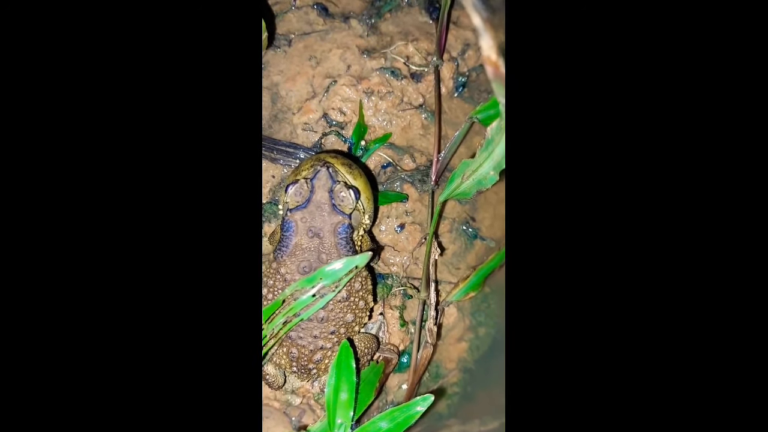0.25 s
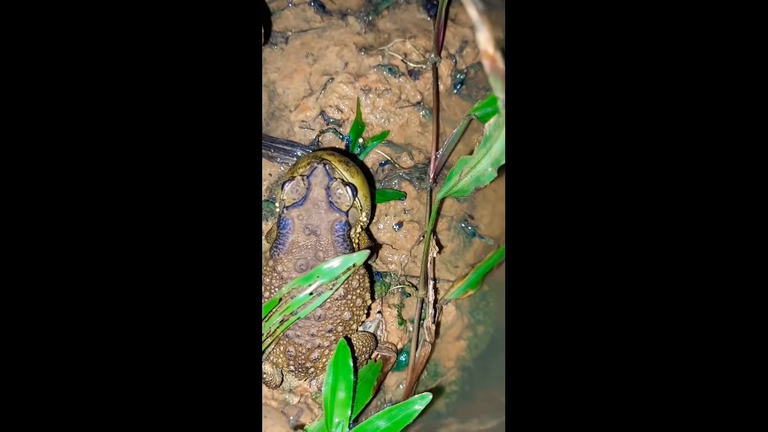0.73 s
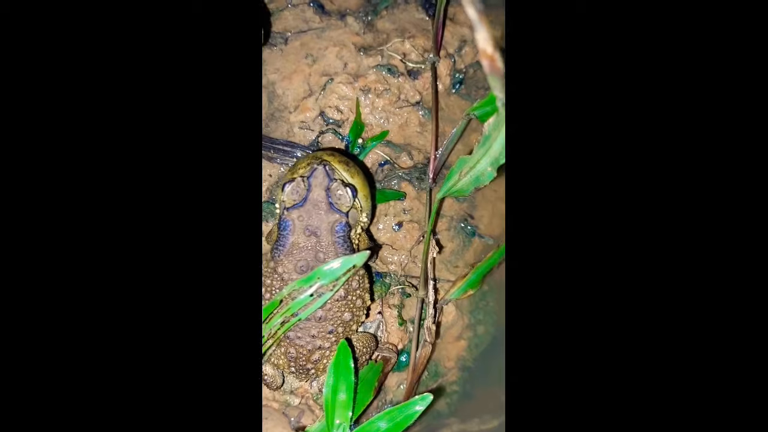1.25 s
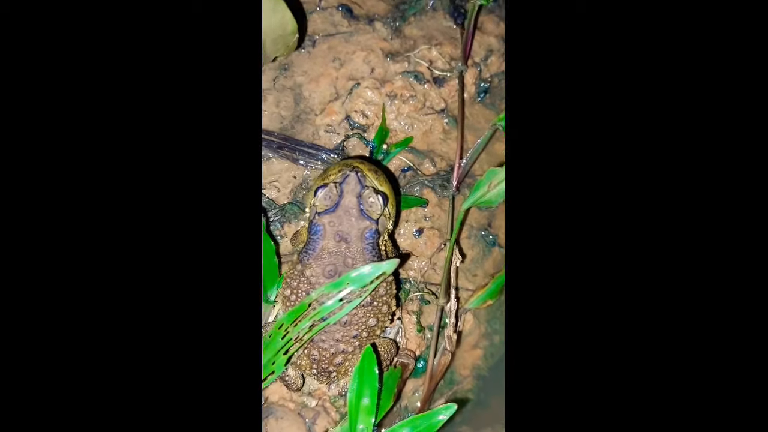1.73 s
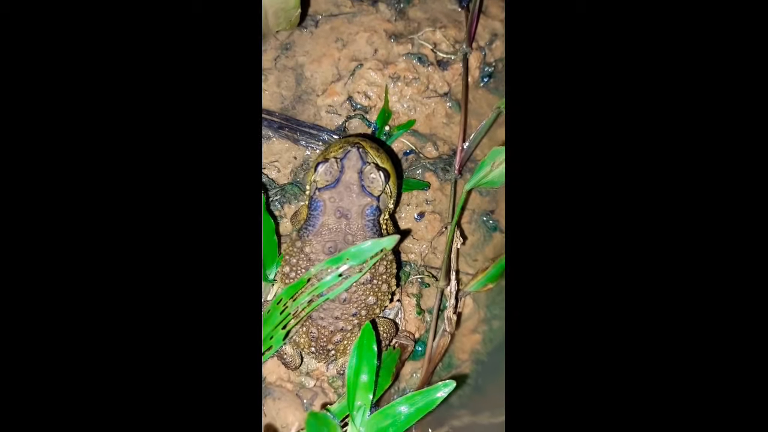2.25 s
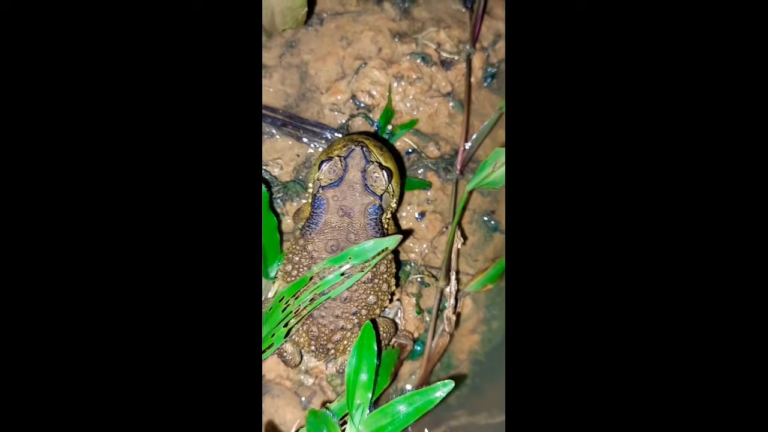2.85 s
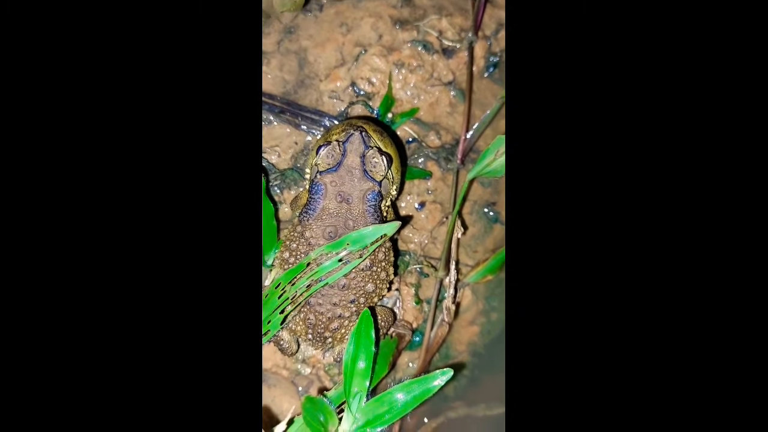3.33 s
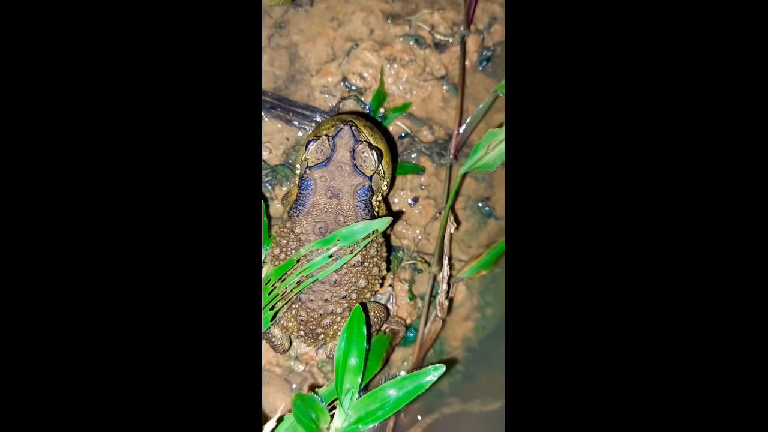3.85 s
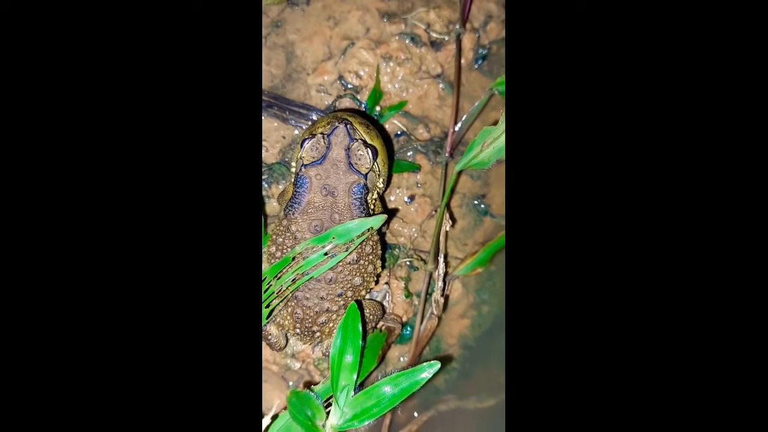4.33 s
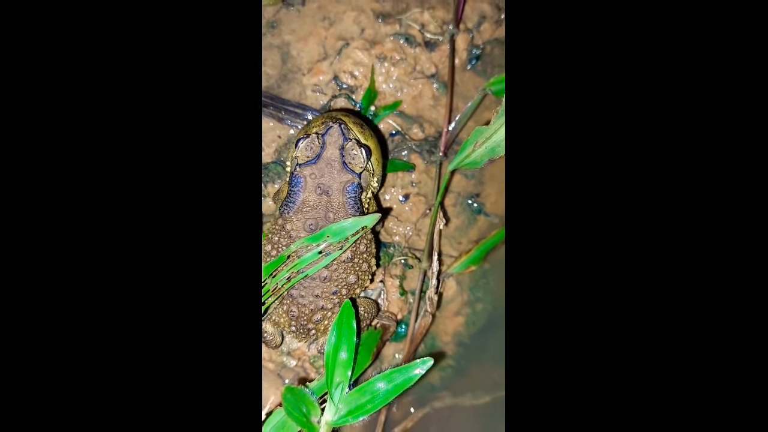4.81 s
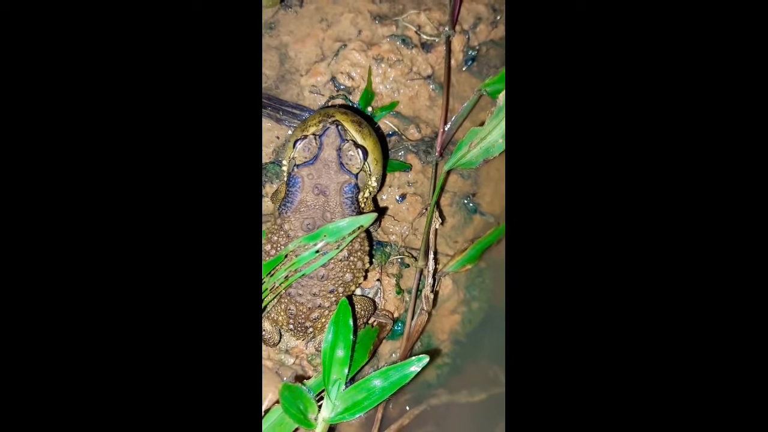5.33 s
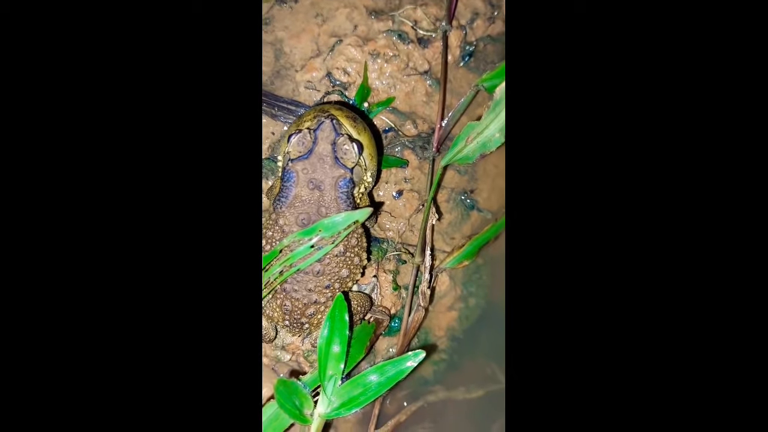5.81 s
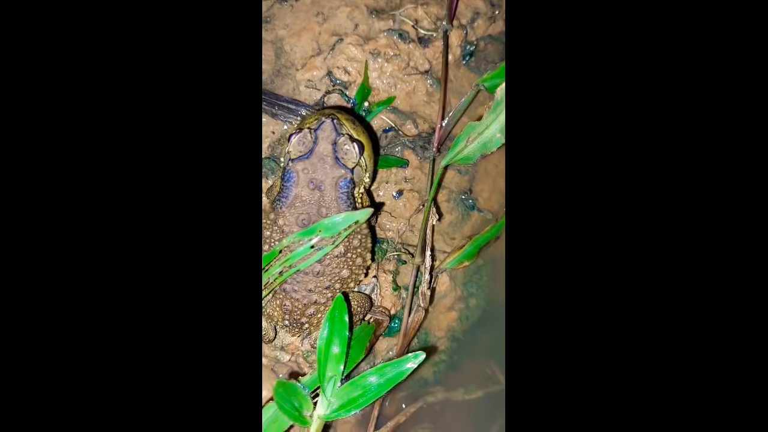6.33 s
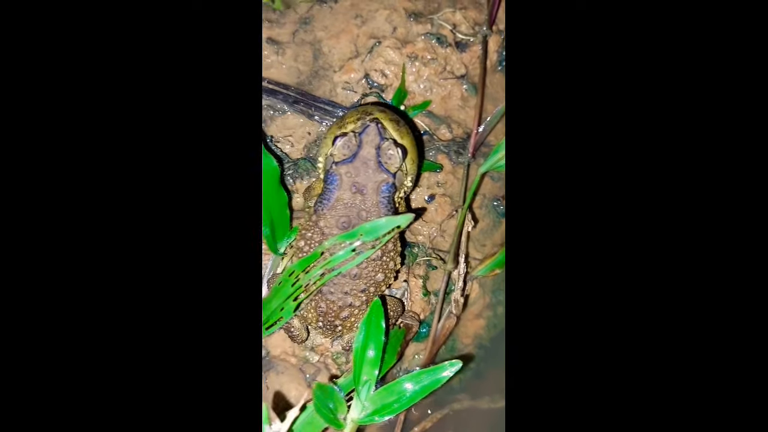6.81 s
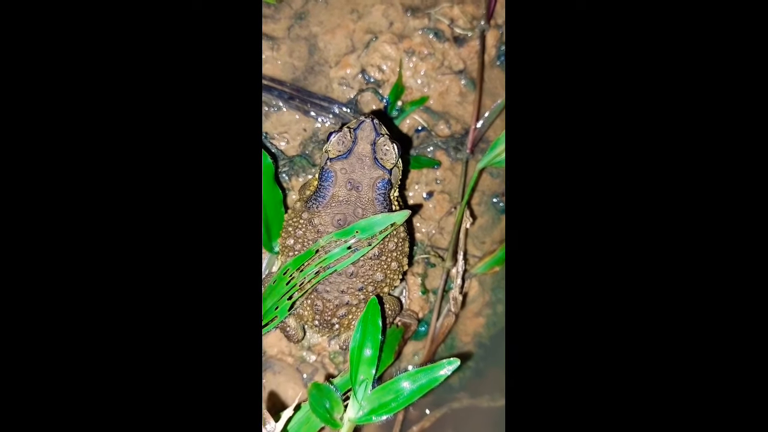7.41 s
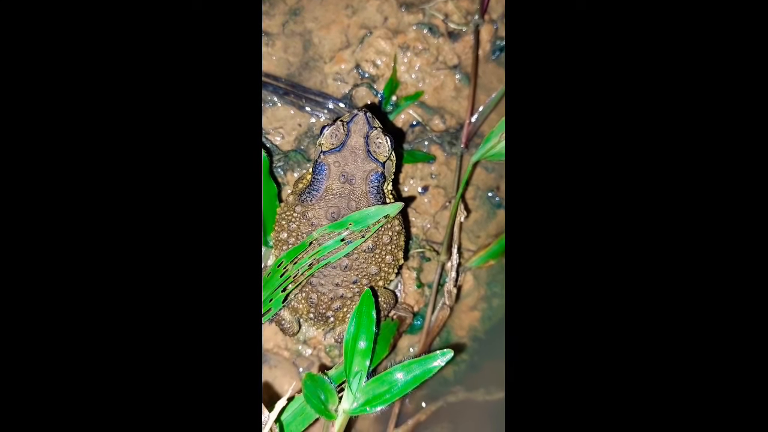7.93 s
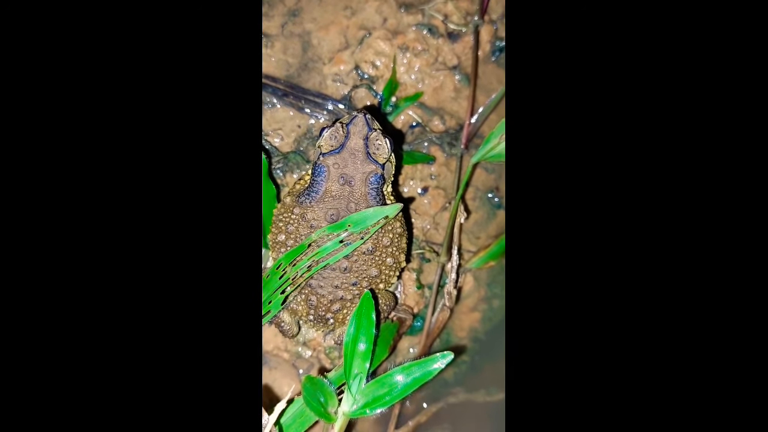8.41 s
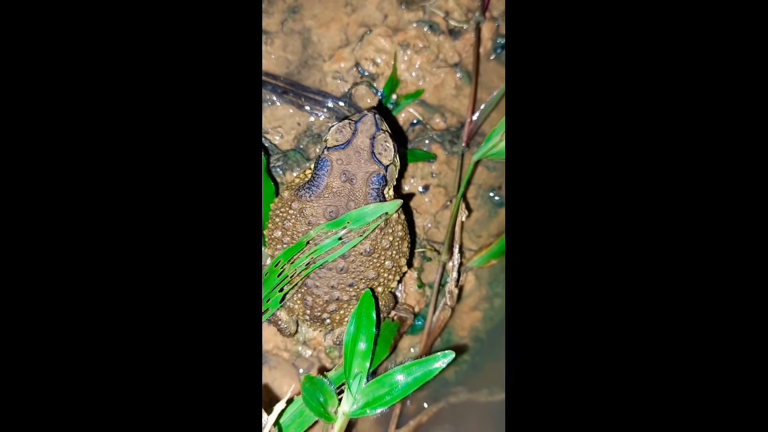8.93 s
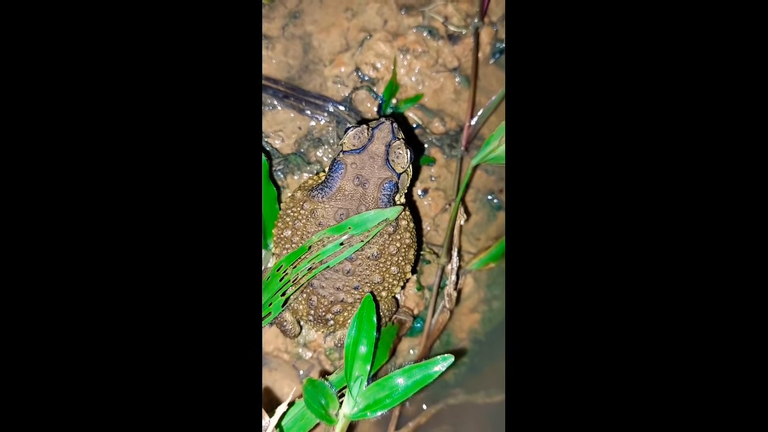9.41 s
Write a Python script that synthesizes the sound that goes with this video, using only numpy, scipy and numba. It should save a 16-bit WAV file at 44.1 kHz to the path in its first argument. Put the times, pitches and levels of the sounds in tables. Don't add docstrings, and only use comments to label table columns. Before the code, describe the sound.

Outdoors at night on wet ground, through a stereo phone at arm's length. From 0 s a close toad trills loudly at a steady pitch around 1.4 kHz: hard, hollow rapid pulses grouped into notes, about six a second at first, slowing to four or five and growing longer, each closing in a short buzzing run with a slight sagging tone. Limiting keeps it dense and pushes the night down. A similar toad trills faintly behind, high crickets shimmer, and a deeper frog gives lone rough croaks near 2.9, 3.1, 4.1 and 4.8 s. Just before 7 s the near toad stops. The background rises: the farther toad keeps trilling, the frog croaks about twelve times a second from 7.2 to 8.4 s, low crickets tick, and a falling mid-high cricket joins around 8 s. From 9.5 s another toad adds quick knocks and two short drooping tones before the end.

```python
import sys
import numpy as np
from scipy import signal
from scipy.io import wavfile
from numba import njit

SR = 44100
rng = np.random.default_rng(int(sys.argv[2]) if len(sys.argv) > 2 else 0)


def volts_from_db(level):
    exponent = np.asarray(level, float) / 20
    return 10 ** exponent


def bounce(signal):
    frames = np.transpose(np.atleast_2d(signal))
    limited = np.clip(frames, -1, 1)
    pcm = np.round(limited * 32767).astype(np.int16)
    wavfile.write(sys.argv[1], SR, pcm)


N = 426006


def ports(wave, left_db, lead):
    left = volts_from_db(left_db) * np.exp(1j * lead) * wave
    return np.array([left.imag, wave.imag])


def through_leaves(pair, share, rate_hz):
    lowpass = signal.butter(2, rate_hz, fs=SR, output="sos")
    blur = signal.sosfilt(lowpass, rng.standard_normal((2, N)))
    return pair * (1 + share * blur / np.std(blur)) / np.sqrt(1 + share ** 2)


def tones(starts, levels_db, length, hz, fall, skew, overtone_db=-90, scatter=1):
    out = np.zeros(N + SR, complex)
    u = np.arange(int(length * SR)) / (length * SR)
    shape = np.sin(np.pi * u ** skew) ** 0.5
    for s, level_db, (detune, start) in zip(starts, levels_db, rng.random((len(starts), 2))):
        pitch = hz * (1 + 0.015 * (detune - 0.5) - fall * (u ** 2 - scatter / 3))
        phase = 2 * np.pi * (scatter * start + np.cumsum(pitch) / SR)
        wave = np.exp(1j * phase) + volts_from_db(overtone_db) * np.exp(2j * phase)
        first = max(int(s * SR), 0)
        out[first:][:len(u)] += volts_from_db(level_db) * shape * wave
    return out[:N]


def night_floor(edge_db, alike, flicker_db):
    # (frequency [Hz], level [dB per Hz])
    spectrum = [(40, -30), (80, -6), (160, -22), (300, -25), (500, -16), (1100, -18), (1400, -1),
                (1800, -8), (2700, -14.5), (4000, -22), (7600, -28.5), (9200, -25), (11000, -44),
                (13000, -45.5), (15500, -60.5)]
    hz, level_db = np.transpose(spectrum)
    edges = 30 * 2 ** np.arange(0, 9.1, 1 / 3)
    white = rng.standard_normal((2, 2, N))
    out = 0
    for k, (low, high) in enumerate(zip(edges, edges[1:])):
        band = signal.butter(2, [low, high], "band", fs=SR, output="sos")
        mid, side = signal.sosfilt(band, white[k % 2])
        flicker = np.interp(np.arange(N), np.linspace(0, N, 250), rng.standard_normal(250))
        band_db = np.interp(np.log(low * high) / 2, np.log(hz), level_db) + flicker_db * flicker
        gain = volts_from_db(band_db + edge_db * (high < 650 or low > 10000))
        like = np.clip(alike * 150 / high, 0, 1)
        out = out + gain * (np.sqrt(1 + like) * mid + np.sqrt(1 - like) * side * [[1], [-1]])
    return volts_from_db(-31.5 + 2) * out / np.sqrt(np.mean(out ** 2))


def low_crickets():
    # (start [s], gap [s], chirps [count], peak level [dB])
    runs = [
        (6.881, .049, 5, -45),
        (7.114, .0345, 7, -42),
        (7.357, .053, 4, -42),
        (7.57, .0373, 20, -38),
        (8.3315, .0535, 7, -35),
        (8.697, .0375, 19, -35),
        (9.4265, .054, 5, -37),
    ]
    early = np.cumsum(rng.uniform(0.03, 0.06, 150))
    early = early[early < 6.8]
    chirp_list = [(first + gap * k, db) for first, gap, chirps, db in runs for k in range(chirps)]
    s, peak_db = np.transpose(chirp_list)
    peak_db = peak_db + rng.normal(0, 1.2, len(s))
    levels_db = np.append(rng.normal(-33.5, 0.63, len(early)), peak_db + 4.5)
    chirps = tones(np.append(early, s - 0.005), levels_db, 0.0254, 3370, 0.1, skew=0.72)

    ticks = np.arange(0.0186, N / SR, 0.02656)
    ticks_db = np.interp(ticks, [7, 7.15, 7.4, 7.6, 8.7, 9], [-29, -24.5, -21, -36, -30, -25.5])
    ticks_db = ticks_db + rng.normal(0, 4.0, len(ticks))
    dry_ticks = tones(ticks, ticks_db, 0.0038, 2583, 0.081, skew=1.0)
    pair = ports(chirps, -1.8, 1.0) + ports(dry_ticks, -1.2, 0.44)
    return through_leaves(pair, share=0.53, rate_hz=160)


def mid_cricket():
    # (time [s], peak level [dB])
    wing_strokes = [(7.9407, -52), (8.0136, -50), (8.0914, -46), (8.1386, -36), (8.1777, -43),
                    (8.2879, -39), (8.3364, -35), (8.3815, -33), (8.4755, -46), (8.5349, -39),
                    (8.5776, -32.5), (8.6257, -32.5), (8.7793, -40), (8.8242, -34.5), (8.8706, -31.5),
                    (9.0223, -31.5), (9.066, -33), (9.112, -36), (9.2104, -44), (9.314, -38), (9.3575, -33),
                    (9.3979, -40), (9.4503, -50), (9.4957, -49), (9.5581, -40), (9.6023, -37)]
    s, peak_db = np.transpose(wing_strokes)
    strong = tones(s - 0.004, peak_db + 1.5, 0.029, 5240, 0.163, skew=0.39)
    faint = tones(s + 0.015, peak_db - 3.0, 0.027, 5300, 0.2, skew=1.0)
    return through_leaves(ports(strong + faint, -0.54, 0.98), share=0.8, rate_hz=240)


def high_cricket():
    # (chirp number [count], end of that chirp [s])
    beat = [(0, .02), (7, 1.079), (10, 1.469), (11, 1.643), (15, 2.174), (16, 2.35), (19, 2.747),
            (20, 2.905), (28, 4.065), (34, 4.915), (35, 5.071), (40, 5.76), (41, 5.921), (53, 7.655),
            (60, 8.653), (61, 8.778), (62, 8.95), (67, 9.68)]
    number, end_s = np.transpose(beat)
    ends = np.interp(np.arange(number[-1] + 1), number, end_s)
    stroke = np.arange(15)
    starts = (ends[:, None] - (15 - stroke) / 121.5).ravel()
    starts = np.maximum(starts, 0)
    swell_db = -32 + 0.15 * stroke - 18.0 * np.exp(-stroke / 2.1)
    levels_db = np.tile(swell_db, len(ends)) + rng.normal(0, 0.63, len(starts))
    wave = tones(starts, levels_db, 0.0091, 9004, 0.044, skew=1.7)
    wave = wave + tones(starts, levels_db - 9.0, 0.0046, 9800, 0.084, skew=2.8)
    return through_leaves(ports(wave, 0.14, 1.57), share=0.69, rate_hz=430)


def night():
    # (time [s], level [dB], bass and top [dB])
    slow_gain = [
        (0, -2, 2.5),
        (3, -3, 5),
        (6.8, -2.5, -1),
        (7.2, -6, -11.5),
        (7.7, -5, -7),
        (8.2, -1.5, -8.5),
        (8.7, -2.13, -6.5),
        (9.66, -1.47, -3.5),
    ]
    s, *gains = np.transpose(slow_gain)
    night_db, edge_db = (np.interp(np.arange(N) / SR, s, g) for g in gains)
    crickets = high_cricket() + mid_cricket() + low_crickets()
    return (crickets + night_floor(edge_db, alike=0.58, flicker_db=4.0)) * volts_from_db(night_db)


def pulse_times(groups, spacing):
    times = []
    for start, n in groups:
        k = np.arange(round(n))
        times.append(start + spacing * k * (1 - 0.0218 * k))
    s = np.concatenate(times)
    return s + rng.normal(0, 0.00021, len(s))


def struck(times, sac, rise, uneven_db):
    times, t, out = np.sort(times), np.arange(N) / SR, 0
    now = np.searchsorted(times, t) - 1
    effort_db = uneven_db * rng.standard_normal(len(times))
    tension = 1 + 0.014 * rng.standard_normal(len(times))
    wait = np.exp(-np.maximum(t - times[now], 0) / rise)
    rings = []
    for k in (now, now - 1):
        age = np.clip(t - times[k], 0, 1)
        turn = tension[k] * (age + 0.053 * 0.0026 * (1 - np.exp(-age / 0.015)))
        rings.append((k, age, turn))
    for hz, t60, level_db, left_db, lead in sac:
        strength = volts_from_db(level_db + effort_db + 0.5 * uneven_db * rng.standard_normal(len(times)))
        new, old = ((k >= 0) * strength[k] * np.exp(2j * np.pi * hz * turn - np.log(1000) / t60 * age)
                    for k, age, turn in rings)
        out = out + ports((1 - wait) * new + wait ** 1.75 * old, left_db, lead)
    return out


def latecomer():
    # (time [s], pulses [count])
    knocks = [
        (9.539, 1),
        (9.546, 1),
        (9.558, 1),
        (9.581, 1),
        (9.599, 1),
        (9.606, 2),
        (9.623, 2),
        (9.658, 1),
    ]
    # (frequency [Hz], t60 [s], level [dB], left over right [dB], left lead [rad])
    sac = [(1150, 0.014, 6, -5.5, 1.7), (580, 0.012, -12, 4, 0.29), (1850, 0.0083, -28, -10, 1.5),
           (1426, .02, 2.5, -4.5, 3.4)]
    # (time [s], length [s], frequency [Hz], level [dB])
    held_tones = [
        (9.585, .018, 1194, -5),
        (9.633, 0.034, 1216, 0.5),
    ]
    held = 0
    for s, length, hz, db in held_tones:
        held = held + tones([s], [db], length, hz, 0.13, skew=0.52, overtone_db=-35, scatter=0)
    knocking = struck(pulse_times(knocks, 0.0098), sac, rise=0.0018, uneven_db=5.0)
    return knocking + ports(held, -4.5, 2.17)


def frog():
    # (frequency [Hz], t60 [s], level [dB], left over right [dB], left lead [rad])
    sac = [(632, 0.039, -17.5, -5.5, 1.6), (738, 0.031, -20, -2, 1.8), (2029, 0.022, -16, 2.7, 1),
           (2300, 0.021, -16, -9, 0.72), (2530, 0.012, -21.5, 5, 0.48), (1020, 0.013, -47, 3, 1.2)]
    tries = [
        2.9,
        3.065,
        4.075,
        4.755,
    ]
    # (time [s], level [dB])
    effort = [
        (4.8, -1.5),
        (7.2, -7),
        (7.46, -1),
        (8.4, 3),
    ]
    row = [7.212 + 0.0802 * k for k in range(15)]
    croaks = [(s, 6) for s in [*tries, *row]]
    croaking = struck(pulse_times(croaks, 0.009), sac, rise=0.0047, uneven_db=3.0)
    effort_db = np.interp(np.arange(N) / SR, *np.transpose(effort))
    return through_leaves(croaking, share=0.25, rate_hz=68) * volts_from_db(effort_db)


def note(rhythm, start, closing_s, closing, opening, thin):
    rest, per_pulse, thin_s, pair_s, kept = rhythm
    first = start + rest + per_pulse * round(opening)
    count = max(round(2 * (closing_s - first) / (thin_s + pair_s)), 1)
    beats = np.arange(1, count + 1)
    again = (beats == round(thin) + 2) & (beats <= len(beats) - kept)
    single = (round(thin) > 0) & ((beats == round(thin)) | again)
    ends = np.cumsum(np.where(single, thin_s, pair_s))
    times = first + (closing_s - first) * np.append(0, ends[:-1]) / ends[-1]
    return [(start, opening), *zip(times, 2 - single), (closing_s, closing)]


def song(rhythm, rows):
    return [group for row in rows for group in note(rhythm, *row) if group[0] < N / SR]


def fold_snaps(times, snap_db):
    after_pause = np.diff(times, prepend=-1) > 0.03
    at = np.clip(((times + 0.001) * SR).astype(int), 0, N - 1)
    ticks = np.zeros(N)
    ticks[at] = volts_from_db(snap_db + 3.8 * after_pause + rng.normal(0, 1.5, len(times)))
    puff = signal.lfilter([1], [1, -np.exp(-1 / (0.00032 * SR))], ticks + 1e-18)
    puff = puff * (np.array([[0.8], [-0.6]]) + 0.69 * rng.standard_normal((2, N)))
    return signal.sosfilt(signal.butter(2, [3600, 12000], "band", fs=SR, output="sos"), puff)


def toad(groups, sac, spacing, rise, snap_db, held_db, held_s, held_fall, overtone_db):
    start, pulses = np.transpose(groups)
    times = pulse_times(groups, spacing)
    last = times[np.cumsum(np.round(pulses).astype(int)) - 1]
    pause = start[1:] - last[:-1]
    closing = (np.append(pause, 1) > 0.024) & (np.append(1, pause) < 0.03) & (pulses > 2.5)
    hz, _, level_db, left_db, lead = sac[0]
    levels_db = level_db + held_db + rng.normal(0, 1.0, closing.sum())
    held = tones(last[closing] - 0.3 * held_s, levels_db, held_s, 1.03 * hz, held_fall, skew=1.35,
                 overtone_db=overtone_db, scatter=0)
    ringing = struck(times, sac, rise, uneven_db=1.78)
    return ringing + ports(held, left_db, lead) + fold_snaps(times, snap_db)


def neighbour_toad():
    # (frequency [Hz], t60 [s], level [dB], left over right [dB], left lead [rad])
    sac = [(1383.7, 0.027, 2.5, -4.5, 4.326), (1804, 0.016, -6.5, -5, 0.16),
           (1247, 0.0047, -13.5, 15, 2.73), (642, 0.02, -29.5, 3.5, 0.17), (2540, 0.0028, -10.5, 4.5, 1.2)]
    # (start [s], closing run [s])
    warming = [(.117, .16), (.235, .29), (.404, .445), (.539, .596), (.709, .78), (.88, .919),
               (1.012, 1.055), (1.155, 1.211), (1.437, 1.5), (1.59, 1.648), (1.728, 1.783), (1.885, 1.942),
               (2.042, 2.098), (2.344, 2.405), (2.495, 2.553), (2.655, 2.71), (2.826, 2.884), (3.119, 3.18),
               (3.278, 3.335), (3.465, 3.523), (3.625, 3.681)]
    # (start [s], closing run [s], closing pulses [count])
    full = [(3.79, 3.855, 4), (4.288, 4.357, 5), (4.468, 4.532, 5), (4.645, 4.708, 4), (4.969, 5.035, 5),
            (5.145, 5.209, 6), (5.467, 5.53, 5), (5.658, 5.722, 6), (5.85, 5.916, 4), (6.165, 6.228, 5),
            (6.335, 6.4, 5), (6.66, 6.725, 5), (6.857, 6.922, 5), (7.02, 7.082, 5), (7.181, 7.244, 4),
            (7.34, 7.404, 5), (7.502, 7.567, 4), (7.666, 7.748, 4), (7.841, 7.906, 4), (8.011, 8.076, 6),
            (8.173, 8.24, 5), (8.339, 8.419, 5), (8.519, 8.585, 4), (8.688, 8.767, 5), (8.871, 8.95, 5),
            (9.053, 9.133, 5), (9.232, 9.315, 5), (9.414, 9.495, 5)]
    # (rest after opening [s], more per opening pulse [s], thin beat [s], pair beat [s], last pairs kept [count])
    rhythm = (.011, .0075, .0138, .018, 0)
    rows = [(*row, 4, 2, 1) for row in warming] + [(*row, 3, 1) for row in full]
    return toad(song(rhythm, rows), sac, 0.0068, rise=0.0013, snap_db=-43.5, held_db=-9, held_s=0.021,
                held_fall=0.16, overtone_db=-21.5)


def near_toad():
    # (frequency [Hz], t60 [s], level [dB], left over right [dB], left lead [rad])
    sac = [(1416.4, 0.026, 19, -3.5, 2.636), (1760, 0.043, 2, 1, 3.56), (1240, 0.007, -11, 18, 1.46),
           (659, 0.012, 1, -1.5, 0.035), (3080, 0.0083, -7.5, -7, 1.72), (379, 0.011, -15, -25, 0.63),
           (227.6, 0.057, -24.5, -5.5, 0.077), (142.6, 0.041, -23, -11.5, 0.2), (64, 0.067, -31, 2.5, 0.6)]
    # (start [s], closing run [s], closing pulses [count])
    fresh = [(.014, .05, 5), (.15, .186, 5), (.291, .345, 5), (.442, .477, 7), (.6, .667, 5),
             (.777, .829, 5), (.935, 1.003, 5), (1.11, 1.181, 5), (1.287, 1.355, 5), (1.463, 1.534, 5),
             (1.64, 1.709, 5), (1.817, 1.886, 6), (1.989, 2.056, 5), (2.167, 2.257, 5), (2.371, 2.44, 6),
             (2.546, 2.633, 5), (2.744, 2.83, 5)]
    # (start [s], closing run [s], closing pulses [count], opening pulses [count], first thin beat [count])
    tiring = [(2.938, 3.009, 8, 3, 1), (3.139, 3.227, 5, 2, 0), (3.34, 3.411, 8, 3, 0),
              (3.539, 3.625, 6, 2, 1), (3.726, 3.814, 6, 3, 3), (3.923, 4.012, 5, 3, 0),
              (4.125, 4.231, 6, 3, 3), (4.348, 4.451, 8, 2, 1), (4.577, 4.682, 5, 3, 1),
              (4.803, 4.89, 8, 2, 3), (5.017, 5.107, 7, 3, 3), (5.239, 5.364, 5, 3, 2),
              (5.496, 5.636, 5, 3, 2), (5.756, 5.862, 6, 3, 1), (5.982, 6.104, 5, 2, 3),
              (6.221, 6.33, 5, 3, 3), (6.489, 6.595, 6, 3, 1), (6.708, 6.832, 5, 3, 2)]
    # (rest after opening [s], more per opening pulse [s], thin beat [s], pair beat [s], last pairs kept [count])
    rhythm = (.013, .004, .0152, .0168, 2)
    rows = [(*row, 2, 0) for row in fresh] + list(tiring)
    return toad(song(rhythm, rows), sac, 0.0066, rise=0.0015, snap_db=-16.5, held_db=-0.5, held_s=0.023,
                held_fall=0.078, overtone_db=-35)


def scene():
    return night() + latecomer() + frog() + neighbour_toad() + near_toad()


@njit
def limiter_gain(peak, top, attack, release):
    gain, now = np.empty(len(peak)), 0.3
    for i in range(len(peak)):
        want = min(1.0, top / (peak[i] + 1e-9))
        now += (want - now) * (attack if want < now else release)
        gain[i] = now
    return gain


def low_pass(x):
    return signal.sosfilt(signal.butter(12, 17500, fs=SR, output="sos"), x)


def record(dry):
    peak = np.abs(dry).max(axis=0)
    gain = limiter_gain(peak, 0.91, 1 / (0.000092 * SR), 1 / (0.21 * SR))
    return low_pass(np.clip(dry * gain, -1, 1))


dry = scene()
out = record(dry)
bounce(out)
```